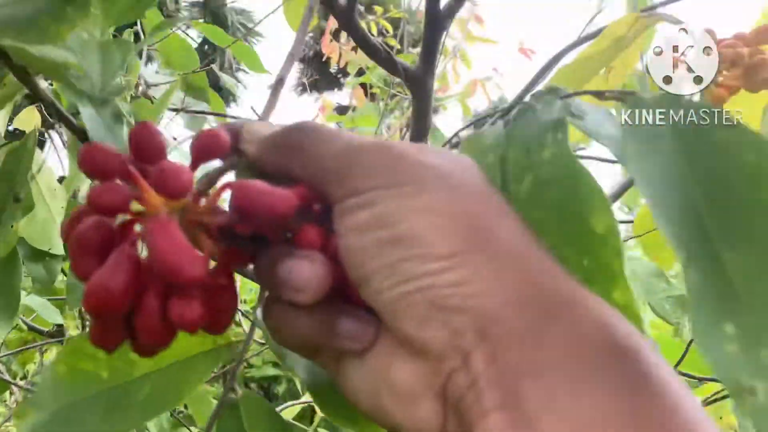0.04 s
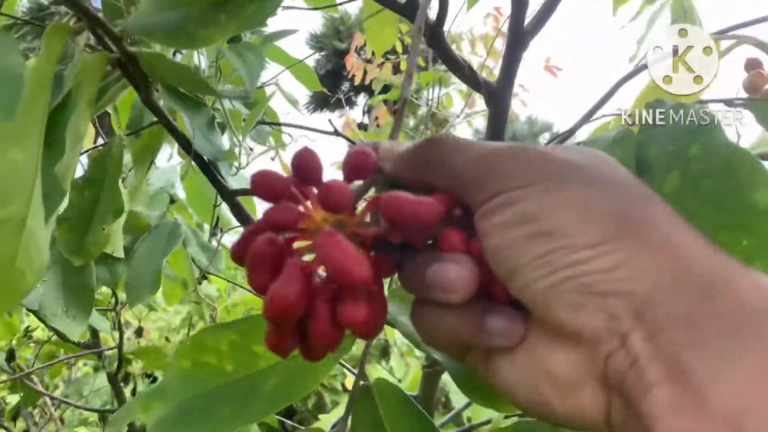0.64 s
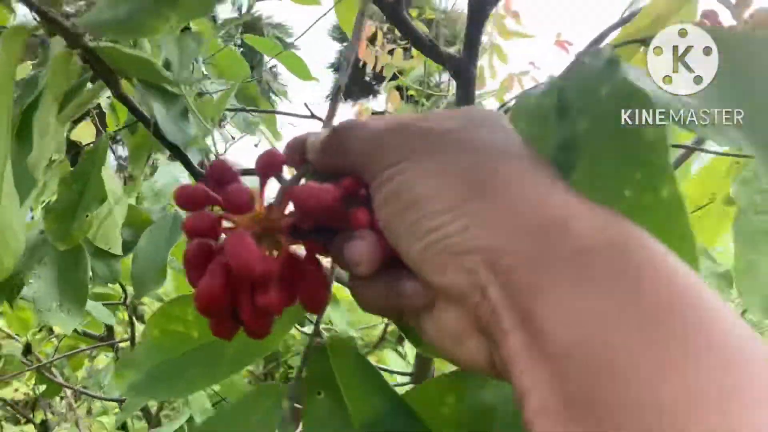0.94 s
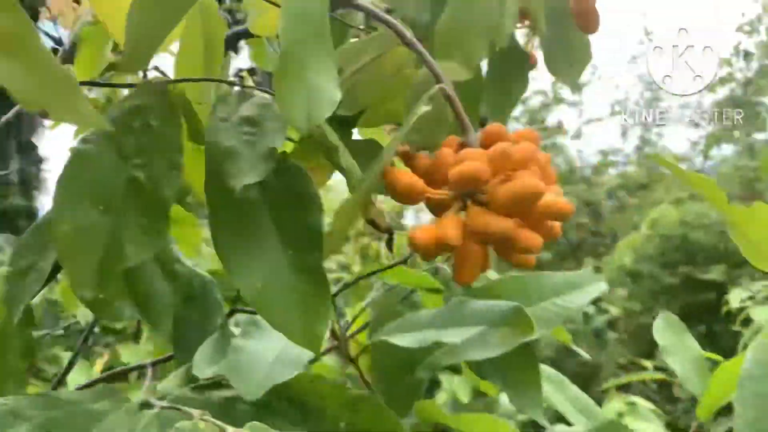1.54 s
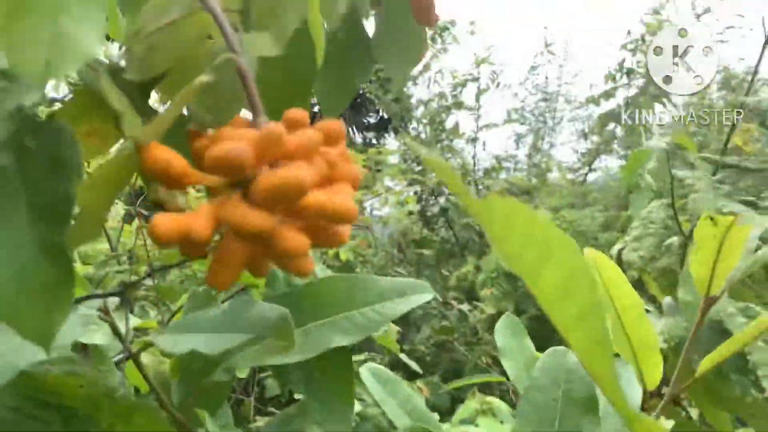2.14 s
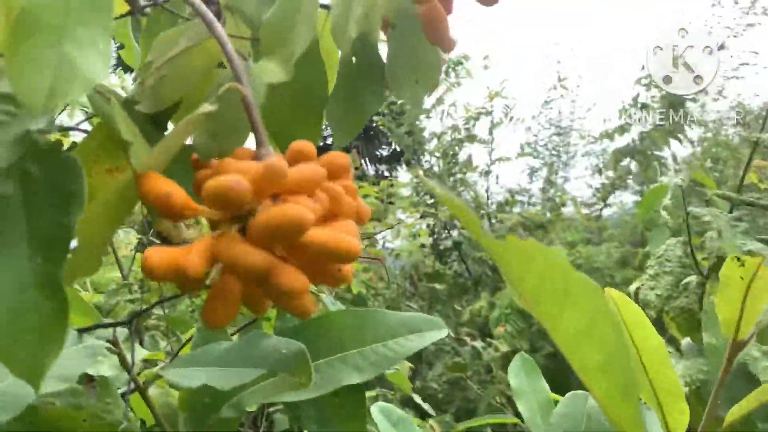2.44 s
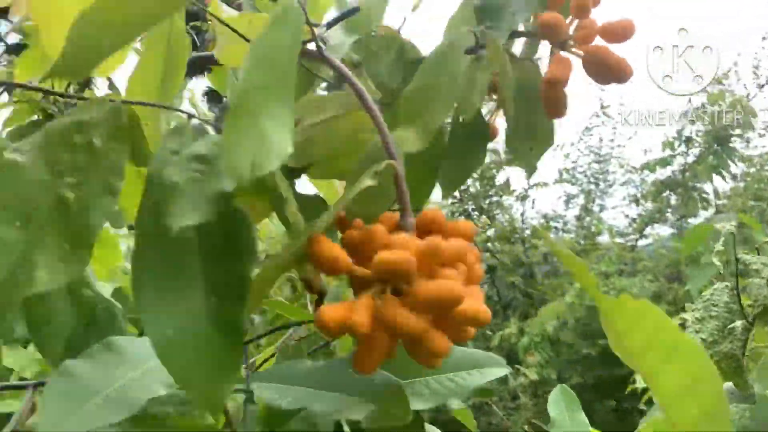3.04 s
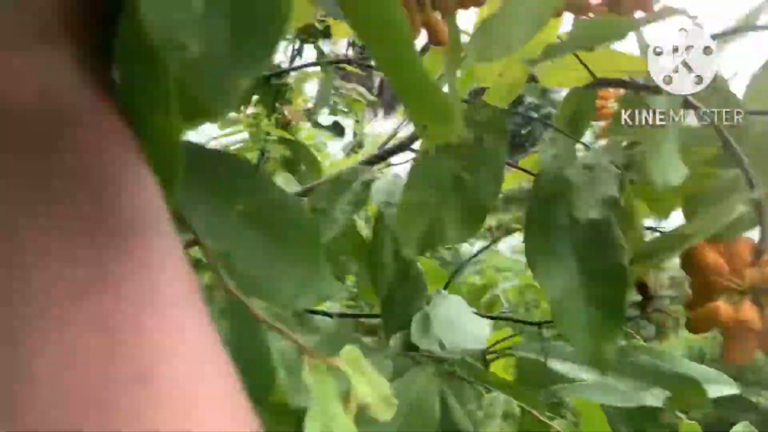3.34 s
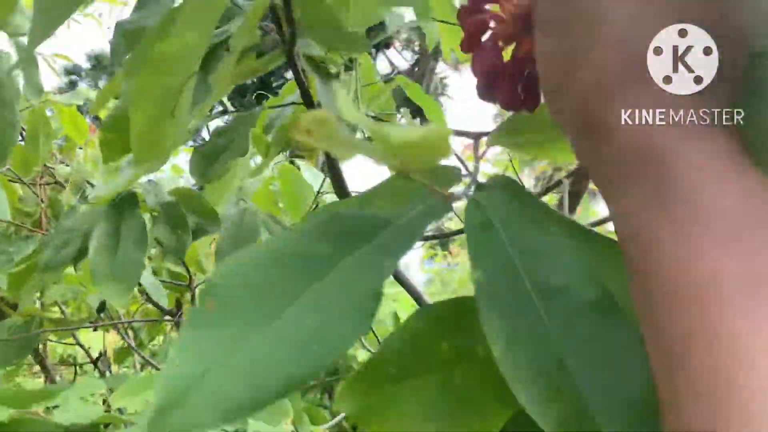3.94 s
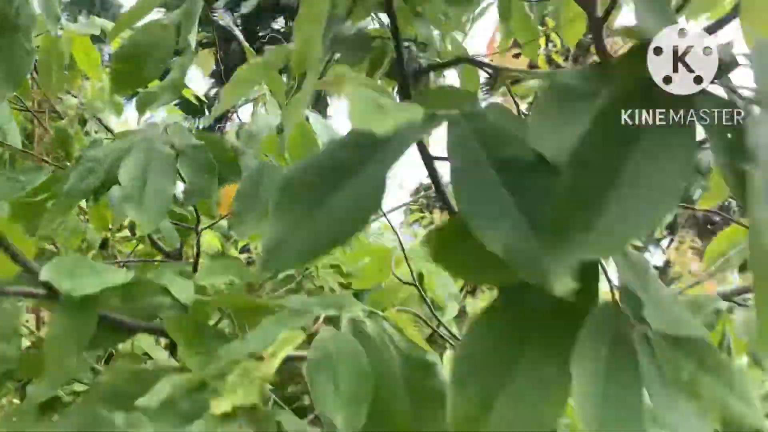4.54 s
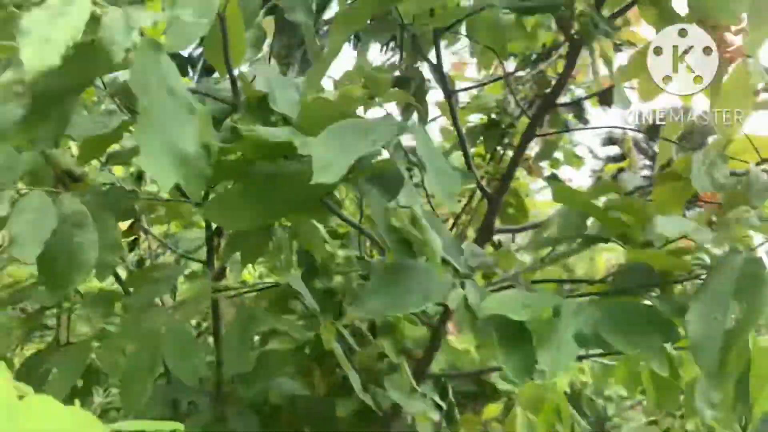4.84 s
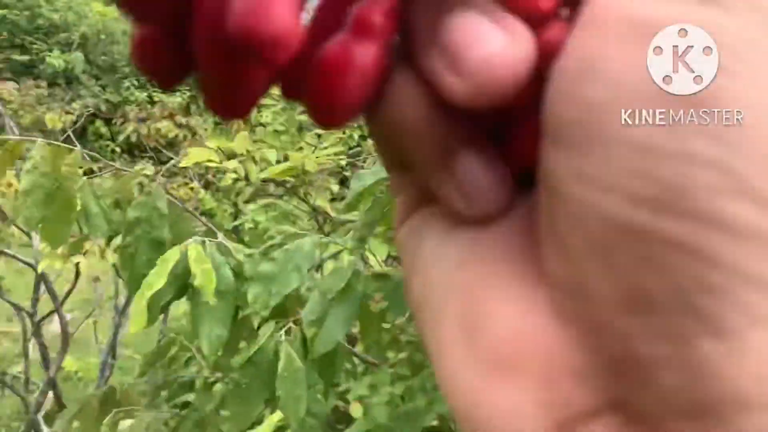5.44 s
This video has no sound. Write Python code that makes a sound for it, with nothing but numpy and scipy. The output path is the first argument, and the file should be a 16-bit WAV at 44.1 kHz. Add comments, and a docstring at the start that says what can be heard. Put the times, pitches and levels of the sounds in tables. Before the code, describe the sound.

Leaves rustle and stalks snap close by as fruit is pulled off a shrub, with faint birds buzzing behind.

```python
"""Picking fruit in a forest

Close to a hand-held phone, a hand pulls a cluster of fruit off a shrub. Leaves slide and crinkle,
twigs scrape and knock, stalks snap, and the freed branch whips back through the foliage.
The hand bumps the phone softly; farther off, small birds buzz and chirp over a low outdoor rumble."""
import sys
import numpy as np
from scipy import signal
from scipy.fft import rfft, irfft
from scipy.io import wavfile
from scipy.ndimage import uniform_filter1d, map_coordinates

SR = 44100
rng = np.random.default_rng(int(sys.argv[2]) if len(sys.argv) > 2 else 0)


def inscribe(sig):
    """Save sig as 16-bit PCM at rate SR to the path in sys.argv[1].

    A 1-D sig is mono; a 2-D sig holds one channel per row.
    Samples are clipped to [-1, 1] before scaling.
    """
    pcm = np.round(np.clip(np.atleast_2d(sig).T, -1, 1) * 32767)
    wavfile.write(sys.argv[1], SR, pcm.astype(np.int16))


N = 242695
TIME = np.arange(N) / SR
TOP_HZ = 15900  # upper limit of the phone


def undb(db):
    """Decibels to gain."""
    return 10 ** (np.asarray(db) / 20)


def unit(x):
    """Scale to rms 1."""
    return x / np.sqrt(np.mean(x ** 2))


def curve(rows, column):
    """One column of a control table at every sample."""
    rows = np.array(rows)
    return np.interp(TIME, rows[:, 0], rows[:, column])


def gains(points, hz):
    """Gain of an (f/Hz, level/dB) table at the given frequencies."""
    f, db = np.transpose(points)
    return undb(np.interp(np.log(hz + 1), np.log(f), db))


def colour(x, points, size=4096):
    """Causal filter of unit power with the given spectrum."""
    cepstrum = irfft(np.log(gains(points, np.fft.rfftfreq(size, 1 / SR))))
    cepstrum[1:size // 2] *= 2  # fold to minimum phase
    cepstrum[size // 2 + 1:] = 0
    response = irfft(np.exp(rfft(cepstrum)))
    return signal.fftconvolve(x, response[None] / np.linalg.norm(response))[:, :N]


def resonate(x, hz, q):
    """One resonance, at rms 1."""
    return unit(signal.lfilter(*signal.iirpeak(hz, q, fs=SR), x))


def walk(rate):
    """Smooth random wander, `rate` steps a second, with a spread near 1."""
    hold = int(SR / rate)
    steps = np.repeat(rng.standard_normal(N // hold + 1), hold)
    return 1.14 * uniform_filter1d(steps, hold)[:N]


def add(out, s, x):
    """Mix a short sound in at time s."""
    i = max(int(s * SR), 0)
    out[..., i:i + x.shape[-1]] += x[..., :N - i]


def arch(length):
    """Times within a note and a rounded envelope over it."""
    u = np.linspace(0, 1, int(length * SR))
    return u * length, np.sqrt(4 * u * (1 - u))


def whistle(hz):
    """A pure tone that follows a pitch curve."""
    return np.sin(2 * np.pi * np.cumsum(hz) / SR)


def crinkle(rate, spread_db, decay_s):
    """Many tiny slips of uneven size, each a brief burst; direct and scattered sound."""
    size = undb(spread_db * np.minimum(rng.exponential(size=N), 5))
    slips = (rng.random(N) < rate / SR) * size ** 2
    power = signal.lfilter([1], [1, -np.exp(-2 / (decay_s * SR))], slips)
    return unit(np.sqrt(power) * rng.standard_normal((2, N)))


# The forest all around the microphone: f/Hz, level/dB
FOREST_SPECTRUM = [(22, -42), (35, -32), (55, -2.5), (80, 0), (120, -5.5), (200, -11.5), (400, -43.5),
                   (1000, -26.5), (2200, -29), (4000, -28), (7000, -23), (15000, -59)]
# Slow course of its rumble: t/s, relative level/dB
RUMBLE_LEVEL = [(0.0, -62), (2.35, -60.5), (3.09, -59), (4.36, -59.5), (4.8, -58), (5.0, -59.5)]
def forest(rumble_db=3, air_db=-68, swell_db=1.47, split_hz=300):
    """A low rumble that swells unevenly, and the faint steady air of the forest."""
    noise = colour(rng.standard_normal((2, N)), FOREST_SPECTRUM)
    noise = signal.sosfilt(signal.butter(4, 30, "high", fs=SR, output="sos"), noise)
    rumble = signal.sosfilt(signal.butter(2, split_hz, fs=SR, output="sos"), noise)
    air = signal.sosfilt(signal.butter(2, split_hz, "high", fs=SR, output="sos"), noise)
    level_db = curve(RUMBLE_LEVEL, column=1) + rumble_db + swell_db * walk(14)
    return rumble * undb(level_db) + air * undb(air_db)


def far_bird(start_s=2.155, length_s=0.13, hz=2150, db=-68):
    """One faint, wavering whistle from far off."""
    song = np.zeros(N)
    t, shape = arch(length_s)
    add(song, start_s, undb(db) * shape ** 2 * whistle(hz + 150 * walk(490)[:len(t)]))
    return song


# Runs of thin chirps from the trees: t/s, number of notes, level/dB
CHIRPS = [(.757, 3, -56), (2.391, 2, -59), (2.567, 1, -54)]
def chirps(hz=6520, fall_hz=380, length_s=0.025, spacing_s=0.06):
    """A small bird sings one short falling note, alone or repeated at an even pace."""
    song = np.zeros(N)
    t, shape = arch(length_s)
    for s, count, db in CHIRPS:
        pitch = hz - fall_hz * np.sin(np.pi / 2 * t / length_s) + 45 * walk(730)[:len(t)]
        note = undb(db) * shape ** 2 * whistle(pitch)
        for k in range(count):
            add(song, s + k * spacing_s, note)
    return song


# Buzzing notes from the trees: t/s, lower voice level/dB, upper voice level/dB, upper voice f/Hz
BUZZES = [(0.126, -48, -44, 7380), (0.32, -49.5, -48.5, 7300), (0.604, -50, -55, 7200),
          (1.335, -54, -51, 7440), (3.54, -48, -45.5, 7300), (4.019, -49, -50, 7300),
          (4.385, -48.5, -52, 7200), (4.944, -54, -48.5, 7340)]
def buzzes(length_s=0.087, lower_hz=6500, swing_hz=170, swell_db=4, buzz_hz=77, flick_hz=215):
    """A small bird pulses two voices at once, the lower one faster; each note swells."""
    song = np.zeros(N)
    t, shape = arch(length_s)
    envelope = shape * undb(swell_db * (t / length_s - 1))
    for s, lower_db, upper_db, upper_hz in BUZZES:
        flick = 2 * np.pi * flick_hz * t + 1.9 * walk(146)[:len(t)]
        upper_pitch = upper_hz + 45 * walk(500)[:len(t)]
        lower_pitch = lower_hz + swing_hz * np.sin(flick) + 70 * walk(570)[:len(t)]
        upper = np.sin(np.pi * buzz_hz * t) ** 2 * whistle(upper_pitch)
        lower = np.sin(flick / 2) ** 2 * whistle(lower_pitch)
        add(song, s, envelope * (undb(upper_db) * upper + undb(lower_db) * lower))
    return song


def birds(echo_db=-3, echo_s=0.015):
    """The trees blur the birdsong on its way to the microphone."""
    song = buzzes() + chirps() + far_bird()
    t = TIME[:SR // 4]
    trees = rng.standard_normal((2, len(t))) * np.exp(-t / echo_s)
    trees /= np.linalg.norm(trees, axis=1, keepdims=True)
    return song + undb(echo_db) * signal.fftconvolve(song[None], trees)[:, :N]


# Bumps of hand and fruit, right at the phone: t/s, f/Hz, level/dB, decay/cycles
BUMPS = [(2.919, 279, -45, 2.1), (2.937, 354, -49.5, 3.4), (2.99, 239, -46, 1.6), (3.007, 447, -39, 1.9),
         (3.011, 204, -46, 1), (3.027, 114, -40.5, 1.3), (3.159, 310, -53, 1.9), (4.501, 229, -35.5, 1.04),
         (4.504, 415, -35, 2.2), (5.094, 76.4, -45.5, 4.5), (5.132, 397, -55, 3), (5.159, 273, -50, 2.2),
         (5.205, 293, -48, 2.5), (5.25, 79.6, -54, 2.9), (5.395, 75, -48, 3.1)]
def bumps(rough=0.33):
    """Soft contacts swell and die within a few cycles."""
    out = np.zeros((2, N))
    t = TIME[:SR // 3]
    for s, hz, db, cycles in BUMPS:
        peak_s = cycles / hz / 2
        envelope = t / peak_s * np.exp(1 - t / peak_s)
        noise = resonate(rng.standard_normal((2, len(t))), hz, q=2.7)
        add(out, s, undb(db) * envelope * (np.sin(2 * np.pi * hz * t) + rough * noise))
    return out


# Bark rubbing on bark as the near branch is drawn aside: t/s, length/s, level/dB
SCRAPES = [(0.82, 0.3, -64), (1.079, 0.13, -56.5), (1.209, 0.15, -55.5), (2.664, 0.14, -63),
           (3.266, 0.125, -54.5)]
# Tone of the bark: f/Hz, level/dB
BARK_SPECTRUM = [(200, -14), (550, -3.5), (1000, -1.5), (1450, -3.5), (2200, -18), (6000, -29)]
def scrapes():
    """Bark sticks and slips in coarse, low grains."""
    out = np.zeros((2, N))
    grains = colour(crinkle(rate=420, spread_db=2.4, decay_s=.002), BARK_SPECTRUM)
    for s, length, db in SCRAPES:
        t, shape = arch(length)
        start = int(s * SR)
        add(out, s, undb(db) * shape * unit(grains[:, start:start + len(t)]))
    return out


# Leaves squeaking close by: t/s, length/s, level/dB, f/Hz
SQUEAKS = [(0.767, 0.03, -64, 4150), (1.183, 0.013, -54, 4300), (4.164, 0.045, -41.5, 3940),
           (4.241, 0.013, -38, 4060), (5.459, 0.04, -47.5, 4040)]
def squeaks(q=8):
    """Fast, uneven stick-slip holds a waxy leaf near one pitch."""
    out = np.zeros((2, N))
    for s, length, db, hz in SQUEAKS:
        t, shape = arch(length)
        slips = rng.standard_normal((2, len(t)))
        add(out, s, undb(db) * shape ** 2 * resonate(resonate(slips, hz, q), hz, q))
    return out


# Twigs knocking together or springing back, within reach: t/s, f/Hz, level/dB, decay/s
KNOCKS = [(0.074, 467, -40, 0.005), (0.253, 1000, -42.5, 0.0033), (0.3445, 1400, -41, .006),
          (0.395, 2950, -36, .003), (0.413, 1300, -45, 0.0027), (0.435, 1434, -34.5, 0.0076),
          (0.453, 1480, -43, .005), (0.5367, 1360, -40, 0.0072), (0.546, 433, -44, 0.011),
          (1.251, 1550, -43, .005), (1.305, 883, -48, 0.0057), (1.516, 290, -48, 0.0051),
          (1.63, 920, -43, 0.0091), (1.696, 525, -45, 0.0097), (2.003, 1000, -39, 0.0073),
          (2.044, 940, -46, 0.0071), (2.08, 910, -48, .006), (2.61, 1066, -46.5, 0.0076),
          (2.9013, 540, -43, 0.0037), (3.0045, 1100, -39.5, 0.0035), (3.092, 596, -38.5, 0.014),
          (3.103, 1020, -38, .006), (3.3281, 810, -31, 0.0048), (3.345, 814, -33.5, 0.0039),
          (3.368, 780, -36, 0.0059), (3.868, 435, -34, 0.0069), (4.466, 2200, -31, 0.0038),
          (4.5055, 675, -29.5, 0.0048), (4.696, 3620, -30.5, 0.0047), (4.766, 2230, -27, 0.0026)]
# Modes of a twig: multiple of its pitch, relative level/dB
TWIG_MODES = [(1, -2), (2.62, -9), (4.15, -7), (6.6, -20), (8.9, -31)]
def knocks(rough=0.52, damping=0.47):
    """A struck twig rings in a few bending modes, the high ones dying first; leaves blur the ring."""
    out = np.zeros((2, N))
    t = TIME[:SR // 8]
    for s, hz, db, decay in KNOCKS:
        for multiple, mode_db in TWIG_MODES:
            if hz * multiple > TOP_HZ:
                break
            ring = rough * resonate(rng.standard_normal((2, len(t))), hz * multiple, q=8.9)
            ring[0] += np.sin(2 * np.pi * hz * multiple * t)  # pure tone in the direct sound only
            add(out, s, undb(db + mode_db) * np.exp(-t / decay * multiple ** damping) * ring)
    return out


def blades(pair, depth_db, width_hz, hold_s, onset_hz=600, fade_hz=7500, size=512):
    """Ever different leaves touch, each with its own resonances, so peaks come and go."""
    hz, _, spectrum = signal.stft(pair, SR, nperseg=size)
    rows, frames = np.indices(spectrum.shape[1:])
    field = rng.standard_normal((400, 400))
    positions = [rows * hz[1] / width_hz, frames * size / (2 * SR * hold_s)]
    peaks = map_coordinates(field, positions, order=3, mode="wrap")
    depth = depth_db * hz / np.hypot(hz, onset_hz) / np.hypot(1, hz / fade_hz)  # smoother bass and top
    gain = undb(depth[:, None] * peaks)
    gain /= np.sqrt(np.mean(gain ** 2, axis=1, keepdims=True))
    return signal.istft(spectrum * gain, SR, nperseg=size)[1][:, :N]


# A near leaf dragging over hand or twig: t/s, length/s, level/dB, ring f/Hz, relative ring level/dB
SCUFFS = [(0.022, 0.11, -57.5, 456, -17), (0.217, 0.034, -64.5, 1320, 3), (0.851, 0.26, -66, 8900, 6.5),
          (1.077, 0.05, -51.5, 1420, -15), (1.5, 0.1, -68, 8050, 5), (1.691, 0.018, -46.5, 11900, -2),
          (1.739, 0.024, -46.5, 2730, -20), (1.77, 0.038, -50.5, 8300, -5.5), (1.949, 0.018, -37, 6800, -6),
          (1.973, 0.029, -40.5, 1820, -5), (1.994, 0.025, -51.5, 500, 5.5), (2.4, 0.037, -51.5, 4400, -2),
          (2.478, 0.043, -45, 510, -26), (3.007, 0.087, -64, 2950, 9.5), (3.113, 0.16, -53, 2770, 0),
          (3.434, 0.038, -47.5, 473, -11), (3.571, 0.034, -46.5, 1310, -26),
          (3.637, 0.053, -51.5, 2330, -14), (4.144, 0.079, -45, 12000, -6), (4.48, 0.016, -39.5, 617, -2),
          (4.483, 0.074, -45, 11100, -2), (4.697, 0.062, -48, 425, 0.5), (5.136, 0.12, -55, 297, -1)]
# Tone of a rasping leaf: f/Hz, level/dB
RASP_SPECTRUM = [(100, 1.5), (300, -0.5), (550, 6), (1200, -3.5), (2200, 5.5), (5000, 0.5), (8500, 4.5),
                 (16000, -6)]
def scuffs(q=5, ease=0.032):
    """A leaf catches and slips in a short rasp that rings its blade and eases off."""
    out = np.zeros((2, N))
    rasp = crinkle(rate=1700, spread_db=2.6, decay_s=.0014)
    broad = colour(rasp, RASP_SPECTRUM)
    for s, length, db, hz, ring_db in SCUFFS:
        t, shape = arch(length)
        part = slice(int(s * SR), int(s * SR) + len(t))
        sound = unit(broad[:, part]) + undb(ring_db) * resonate(rasp[:, part], hz, q)
        add(out, s, undb(db) * shape * (1 - ease * t / length) * sound)
    return out


def whip(start_s=4.475, attack_s=0.0074, decay_s=0.16):
    """Motion of the freed branch through the foliage: a quick rise, then it settles."""
    since = np.maximum(TIME - start_s, 0)
    return np.minimum(since / attack_s, 1) * np.exp(-since / decay_s)


# Foliage moving just in front of the microphone: t/s, sliding level/dB, bending level/dB
RUSTLE = [(0.0, -50, -70), (0.22, -61, -66), (0.3, -55.5, -63.5), (0.39, -48, -59), (0.49, -57.5, -68.5),
          (0.72, -58, -72), (0.86, -55, -68), (1.1, -52.5, -64.5), (1.2, -50.5, -60.5), (1.48, -55, -62),
          (1.76, -49.5, -61), (1.87, -59, -70), (2.05, -52.5, -62), (2.3, -76.5, -76), (2.39, -77, -75),
          (2.45, -55.5, -70), (2.64, -60.5, -66), (2.75, -54.5, -61), (2.86, -60, -70), (3.03, -61, -55),
          (3.085, -59, -50), (3.14, -47, -54.5), (3.23, -45.5, -52.5), (3.44, -46, -54.5), (3.5, -49, -64),
          (3.66, -41.5, -52.5), (3.74, -47, -59), (4.04, -44.5, -57), (4.1, -47, -64), (4.23, -43, -60.5),
          (4.3, -46, -68), (4.42, -44.5, -61.5), (4.65, -43.5, -62.5), (4.85, -42.5, -53),
          (5.1, -47, -55.5), (5.5, -44, -59)]
# Tones of sliding faces, flexing blades, and woody ribs and stalks: f/Hz, level/dB
HISS_SPECTRUM = [(900, -2.5), (1600, -6.5), (2300, -1.5), (3000, -1), (4100, 2), (5100, -2.5), (6400, 3.5),
                 (7500, -2), (8500, 1), (13000, 0), (15500, -3)]
FLEX_SPECTRUM = [(100, 0), (200, -10.5), (350, 3), (600, -2.5), (900, -6.5), (1400, -7.5), (2400, -6.5),
                 (5000, -53.5)]
WOOD_SPECTRUM = [(100, -5), (400, 9.5), (900, 9), (1600, -5), (2600, 6.5), (4500, 8.5), (8000, 2.5),
                 (15000, -52)]
def leaves(hiss_db=-2.5, tick_db=-8, crackle_db=-11, whip_slide_db=-32, whip_bend_db=-46.5):
    """Sliding leaves hiss and their edges crackle; bending blades patter and their ribs tick."""
    hiss = colour(crinkle(rate=6900, spread_db=1.5, decay_s=0.013), HISS_SPECTRUM)
    patter = colour(crinkle(rate=600, spread_db=3.0, decay_s=0.0085), FLEX_SPECTRUM)
    ticks = colour(crinkle(rate=42, spread_db=2.0, decay_s=0.0078), WOOD_SPECTRUM)
    bending = patter * undb(2.2 * walk(30)) + ticks * undb(tick_db)
    edges = colour(crinkle(rate=70, spread_db=2, decay_s=.0015), RASP_SPECTRUM)
    sliding = hiss * undb(hiss_db + 2.07 * walk(45)) + edges * undb(crackle_db)
    slide_gain = np.hypot(undb(curve(RUSTLE, column=1)), undb(whip_slide_db) * whip())
    bend_gain = np.hypot(undb(curve(RUSTLE, column=2)), undb(whip_bend_db) * whip())
    surges = undb(1.01 * walk(22))
    return (sliding * slide_gain + bending * bend_gain) * surges


# Tone common to all cracks at close range: f/Hz, level/dB
CRACK_SPECTRUM = [(300, -9), (2000, -5), (6000, -11), (8500, 1.5), (12000, 2), (14000, 2.5), (16000, 2.5)]
def stalk_spectrum(hz, focus_db=6, focus_octaves=0.17, db_per_octave=1.5, modes_db=3.0, count=44):
    """One cracking stalk: lifted around its pitch, weaker below, with uneven modes of its own."""
    f = np.linspace(CRACK_SPECTRUM[0][0], TOP_HZ, count)
    octaves = np.log2(f / hz)
    common = 20 * np.log10(gains(CRACK_SPECTRUM, f))
    focus = focus_db * np.exp(-(octaves / focus_octaves) ** 2)
    slope = db_per_octave * np.minimum(octaves, 0)
    modes = modes_db * rng.standard_normal(count)
    return np.column_stack([f, common + focus + slope + modes])


# Stalks and leaf ribs cracking close to the microphone:
# t/s, relative level/dB, woody body offset/dB, decay/s, crack f/Hz
SNAPS = [(0.073, -42.5, -3, 0.0044, 3000), (0.3433, -30, -16, 0.0034, 13000), (0.368, -40, -2, .008, 7000),
         (0.395, -31, -16, 0.0023, 11500), (0.414, -25, -25, 0.0022, 13500),
         (0.4343, -30.5, -7.5, 0.0048, 8000), (0.4521, -15, -16, .0045, 11500),
         (0.535, -18, -15.5, .0035, 12000), (0.5732, -36, -14, .005, 12500),
         (1.626, -34, -7, 0.0017, 11000), (1.9618, -32, -4.5, 0.0036, 7000), (1.979, -28, -6, .012, 7800),
         (2.2117, -45, 0.5, 0.01, 8900), (2.492, -30.5, -9, 0.0016, 8900), (2.523, -35.5, 0, 0.0014, 4500),
         (2.608, -43.5, 1.5, 0.0034, 6000), (2.9012, -48, 3.5, .002, 4000), (3.0395, -33, -9, 0.0078, 8700),
         (3.0901, -34.5, -4.5, .008, 8800), (3.127, -33, -12, .003, 9000), (3.161, -35, -10, 0.0033, 8700),
         (3.258, -34, -9, .004, 10000), (3.297, -27, -20, .002, 13000), (3.3285, -35, -15, 0.0033, 8500),
         (3.344, -32, -23, 0.0045, 11000), (3.454, -35.5, -12, .002, 11000), (3.523, -30, -17, .002, 9000),
         (3.543, -31.5, -33, 0.0035, 9500), (3.579, -36.5, -2, 0.0027, 4000),
         (3.672, -32.5, -9, .003, 10000), (3.859, -10, -31, 0.0016, 12800),
         (3.861, -19.5, -11, 0.0029, 12000), (4.034, -31, -5.5, 0.0018, 9000),
         (4.075, -33, -20, .002, 12500), (4.339, -22.5, -39, 0.0019, 13000),
         (4.4656, -7.5, -29, 0.0019, 13900), (4.499, -15, -10.5, .0025, 10900),
         (4.506, -22, -11, .0035, 8000), (4.578, -30, -16, .002, 10000), (4.623, -30, -22, .003, 12500),
         (4.6953, -25, -2, 0.012, 6900), (4.766, -15, -12, 0.0031, 9100)]
def snaps(crack_db=-8, fracture_db=4, fracture_s=.0004, attack_s=0.0011, fibre_db=3,
          tail_db=-18, tail_s=0.015, body_db=-4, body_s=0.0081):
    """One sharp break, then fibres give way for milliseconds; the stalk rings and its leaves shake."""
    crack, body = np.zeros((2, 2, N))
    t = TIME[:SR // 10]
    rise = 1 - np.exp(-t / attack_s)
    fracture = undb(fracture_db) * np.exp(-t / fracture_s)
    tail = undb(tail_db) * np.exp(-t / tail_s)
    fibres = undb(fibre_db * walk(2200))
    for s, db, wood_db, decay, hz in SNAPS:
        crack_noise, body_noise = rng.standard_normal((2, 2, len(t)))
        tearing = fibres[int(s * SR):][:len(t)] * rise * (np.exp(-t / decay) + tail)
        burst = (fracture + tearing) * crack_noise
        add(crack, s, undb(db + crack_db) * colour(burst, stalk_spectrum(hz)))
        add(body, s, undb(db + wood_db + body_db) * rise * np.exp(-t / body_s) * body_noise)
    wood = colour(body, WOOD_SPECTRUM)
    return crack + blades(wood, depth_db=10, width_hz=342, hold_s=.06, size=256)


# Sound scattered by the foliage, relative to the direct sound at the phone: f/Hz, level/dB
SCATTER = [(60, -6.5), (130, -4), (300, -1.5), (600, -6), (1400, 2), (3000, -1.5), (7000, 1), (8800, -12),
           (11000, -21), (12700, -18), (15500, 0.5)]
# Left microphone port relative to the right: f/Hz, level/dB
PORT_BALANCE = [(60, 2), (250, 1.1), (500, -0.5), (1000, -3), (4000, 0.7), (12000, 1)]
def ports(pair, lag_s, max_cycles=3):
    """Sound reaches the left port lag_s late, by max_cycles at most; scatter widens the image."""
    hz = np.fft.rfftfreq(N, 1 / SR)
    direct, scattered = rfft(pair)
    share = gains(SCATTER, hz)
    delay = np.exp(-2j * np.pi * np.minimum(hz * lag_s, max_cycles))
    left = (direct + share * scattered) * delay
    right = direct - share * scattered
    balance = gains(PORT_BALANCE, hz) ** np.array([[.5], [-.5]])
    return irfft(np.array([left, right]) * balance / np.sqrt(1 + share ** 2), N)


def scene():
    """The shrub close by and a little to the right, birds and forest behind."""
    foliage = blades(leaves() + scuffs(), depth_db=3.5, width_hz=197.5, hold_s=.07)
    shrub = foliage + scrapes() + squeaks() + snaps() + knocks()
    return ports(shrub, lag_s=.00047) + ports(forest(), lag_s=0) + bumps() + birds()


def record(dry):
    """The phone cuts the top treble steeply."""
    return signal.sosfilt(signal.ellip(10, .2, 70, TOP_HZ, fs=SR, output="sos"), dry)


dry = scene()
out = record(dry)
inscribe(out)
```